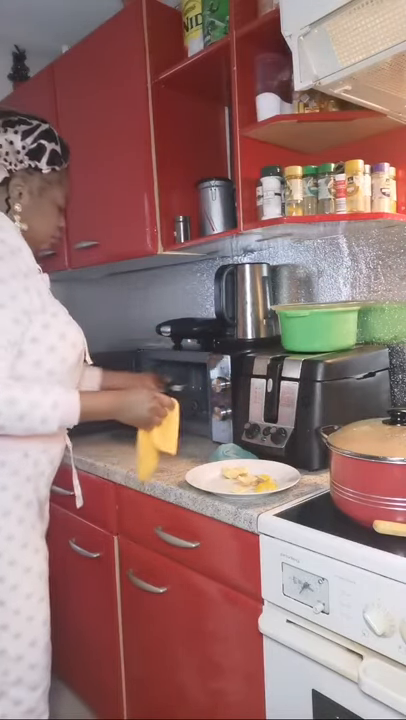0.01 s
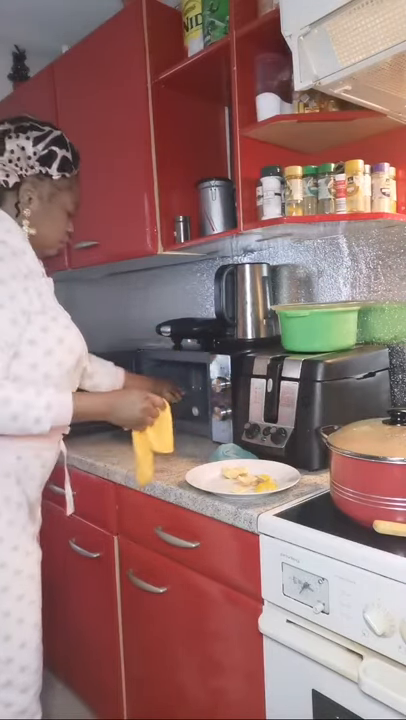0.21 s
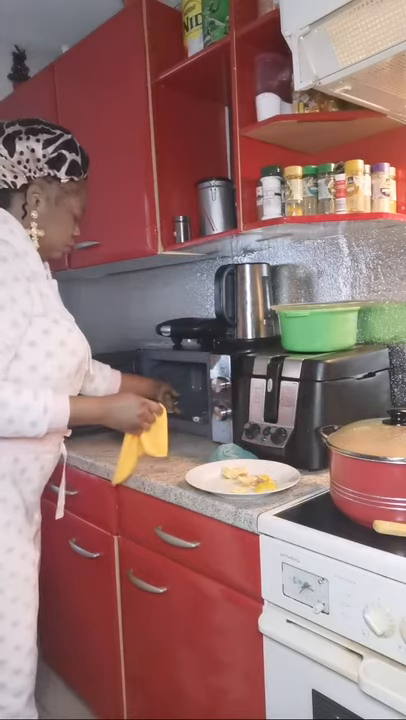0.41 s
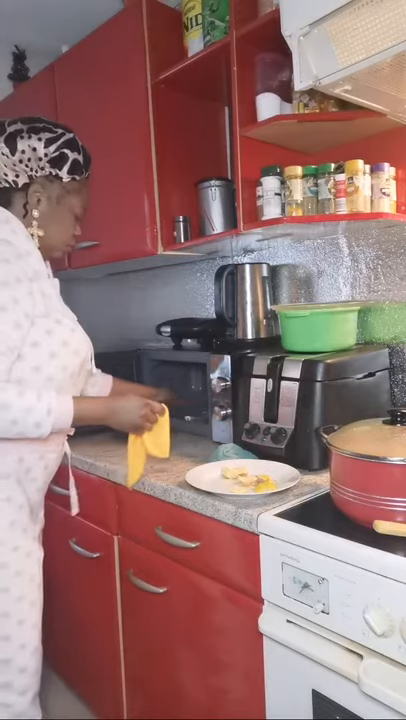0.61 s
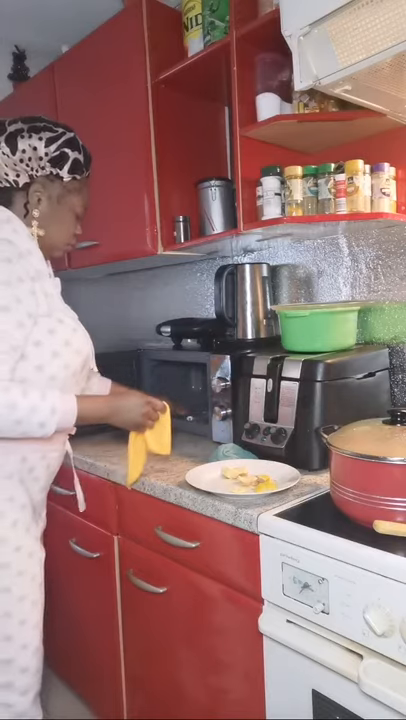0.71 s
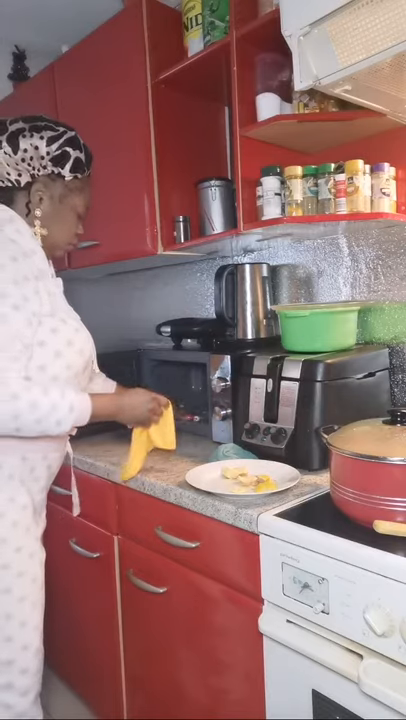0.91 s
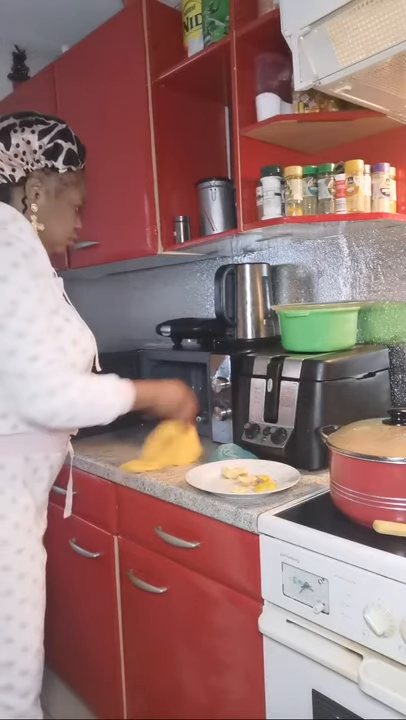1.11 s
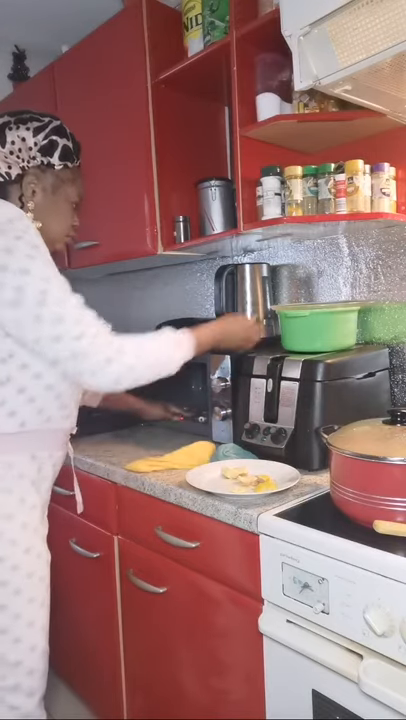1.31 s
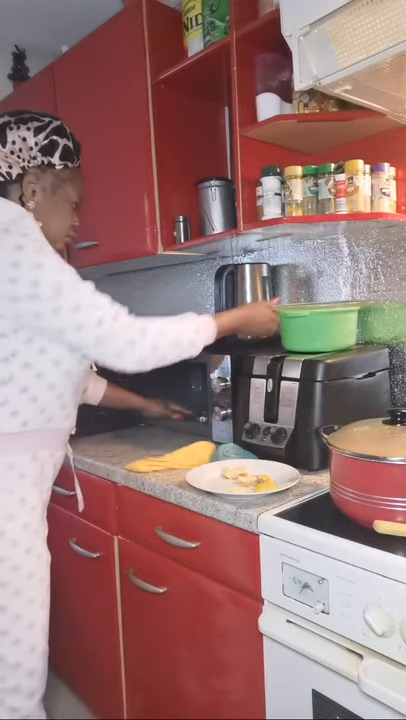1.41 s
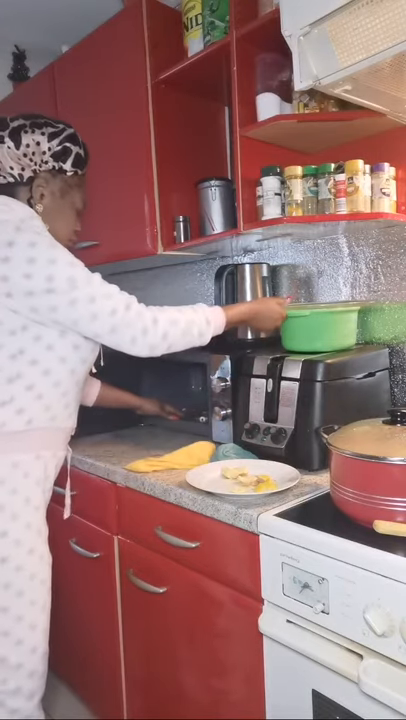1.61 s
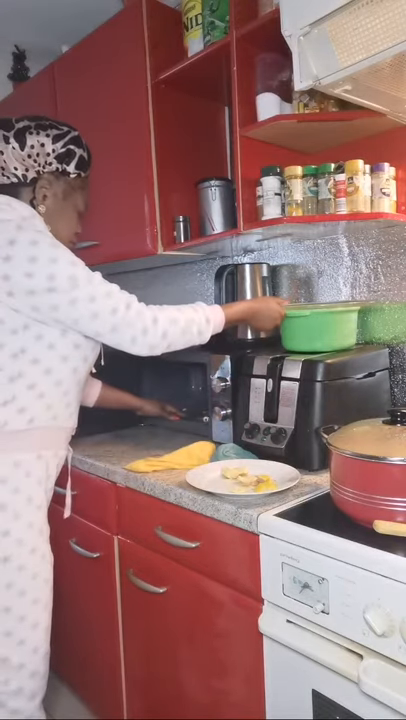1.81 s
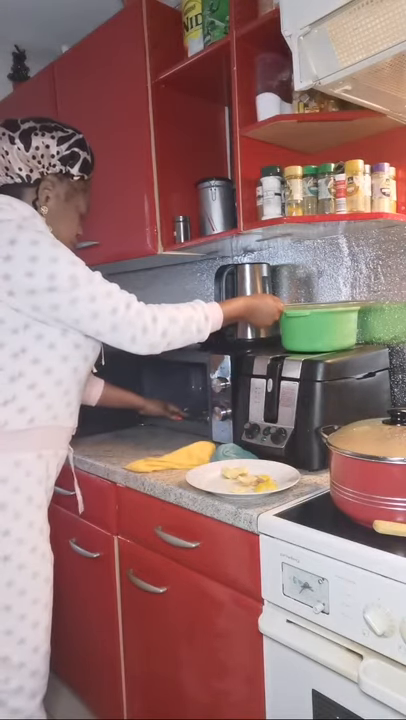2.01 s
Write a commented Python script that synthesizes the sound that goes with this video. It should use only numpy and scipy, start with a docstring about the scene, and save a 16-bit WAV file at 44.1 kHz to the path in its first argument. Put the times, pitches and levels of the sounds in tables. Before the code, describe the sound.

Sharp glassy cracks with short rings come in quick clusters as a turntable plate settles inside a microwave oven, growing softer and duller; hard-walled small kitchen, fairly near microphone, faint air hiss and mains hum.

```python
"""A small hard-walled kitchen: a glass turntable plate is set and shifted inside a microwave oven.
Each contact cracks (grainy noise, shaped in tone and decay) and rings plate, support and steel
cavity (damped sines); the room answers with a diffuse noise tail.
Underneath lie a faint hiss of room air (shaped noise), a wavering appliance hum (narrow noise)
and a steady mains tone (sine)."""
import sys
import numpy as np
from scipy import signal
from scipy.fft import rfft, irfft, next_fast_len
from scipy.io import wavfile

SR = 44100
rng = np.random.default_rng(int(sys.argv[2]) if len(sys.argv) > 2 else 0)


def wav_out(sig):
    """Save sig, one row per channel (or a flat mono array), as 16-bit PCM at SR to the path in sys.argv[1]."""
    wavfile.write(sys.argv[1], SR, np.round(np.clip(np.atleast_2d(sig).T, -1, 1) * 32767).astype(np.int16))


N = 90405


def amp(db):
    """dB to gain."""
    return 10 ** (np.asarray(db) / 20)


def unit(x):
    """Scale to rms 1."""
    return x / np.sqrt(np.mean(x ** 2) + 1e-20)


def along(points, hz):
    """Read a curve of (frequency, value) points on a log frequency axis."""
    f, v = np.transpose(points)
    return np.interp(np.log(hz + 1), np.log(f + 1), v)


def filtered(x, response):
    """Shape the spectrum of x by a gain that depends on frequency."""
    m = next_fast_len(len(x) + 8192)
    return irfft(rfft(x, m) * response(np.fft.rfftfreq(m, 1 / SR)), m)[:len(x)]


# Spectrum of the room air: f/Hz, relative level/dB
AIR_SPECTRUM = [(15, -29), (25, -19), (43, -6), (148, -11), (184, -11.5), (211, -11), (307, -3),
                (361, -15.5), (654, -16.5), (1590, -32.5), (2090, -29.5), (4330, -40.5), (15800, -37)]
AIR_DB = -59.5  # rms


def room_air():
    """Steady broadband hiss, strongest in the bass."""
    return amp(AIR_DB) * unit(filtered(rng.standard_normal(N), lambda f: amp(along(AIR_SPECTRUM, f))))


# Hum resonances: f/Hz, half-width at half gain/Hz, rms level/dB
HUM_BANDS = [(87.8, 7.7, -68.5), (184.7, 8.7, -62.5), (316, 13, -63)]


def appliance_hum():
    """Noise squeezed into narrow resonances, so each hum tone wavers in level."""
    hum = np.zeros(N)
    for hz, width, db in HUM_BANDS:
        band = filtered(rng.standard_normal(N), lambda f: 1 / (1 + ((f - hz) / width) ** 2))
        hum += amp(db) * unit(band)
    return hum


MAINS_HZ, MAINS_PEAK_DB = 50, -65.5


def mains_tone():
    """A steady sine at the mains frequency."""
    return amp(MAINS_PEAK_DB) * np.sin(2 * np.pi * MAINS_HZ * np.arange(N) / SR)


RATTLE_DB, GRAIN = 3.5, 22  # spread of grain levels; grain length in samples (half a millisecond)


def rattle(size):
    """Noise in grains of uneven level: glass chattering on a hard surface."""
    grains = np.repeat(rng.standard_normal(size // GRAIN + 1), GRAIN)[:size]
    return unit(rng.standard_normal(size) * amp(RATTLE_DB * grains))


LEAD = 660  # samples before the blow
SWELL_DB, SWELL_S = -10, 0.0033  # soft noise swelling just before the blow; level, rise time constant
TICK_T60_S = 0.015


def crack(colour, tick_db, t60, t):
    """Noise swells softly, then the blow dies at two speeds: contact noise and a sharp tick."""
    swell = amp(SWELL_DB) * np.exp(-t[LEAD:0:-1] / SWELL_S)
    decay = amp(-60 * t / t60) + amp(tick_db - 60 * t / TICK_T60_S)
    noise = rattle(LEAD + len(t)) * np.r_[swell, decay]
    # the square root darkens the noise before the landing's own colour
    return filtered(noise, lambda f: amp(along(colour, f)) / np.sqrt(f / 3000 + 0.037))


MODE_SCATTER_DB, RING_RISE_S = 2, 0.0073  # spread of mode levels; rise time constant


def ring(modes, t, free):
    """Damped sine modes, levels new for each blow; free is the share of the free ring length."""
    hz, db, t60 = np.transpose(modes)[:, :, None]
    level = db + MODE_SCATTER_DB * rng.standard_normal(hz.shape) - 60 * t / (t60 * free)
    return (amp(level) * np.sin(2 * np.pi * hz * t)).sum(0) * (1 - np.exp(-t / RING_RISE_S))


# Decay of the room: f/Hz, t60/s
ROOM_DECAY = [(250, 0.32), (1000, 0.51), (3000, 0.41), (7000, 0.28), (15000, 0.18)]
# Build-up of the room: f/Hz, time constant/s
ROOM_BUILDUP = [(250, 0.01), (1000, 0.0027), (4000, 0.001)]


def room_tail():
    """A fresh diffuse answer; each frequency builds up and dies at its own speed."""
    hz, t, noise = signal.stft(rng.standard_normal(SR // 2), SR, nperseg=128)
    decay = amp(-60 * t / along(ROOM_DECAY, hz)[:, None])
    buildup = 1 - np.exp(-t / along(ROOM_BUILDUP, hz)[:, None])
    shape = decay * buildup
    shape = shape / np.linalg.norm(shape, axis=1, keepdims=True)
    tail = signal.istft(noise * shape, SR, nperseg=128)[1][:SR // 2]
    return tail / np.linalg.norm(tail)


# Centres of the ten colour bands: f/Hz
COLOUR_HZ = [220, 450, 880, 1400, 2050, 3000, 4500, 6700, 10000, 14500]
# Each landing of the glass: t/s, level/dB, ten colour levels/dB (at COLOUR_HZ),
# plate ring/dB, cavity ring/dB, support ring/dB, ring length/share of free ring,
# sharp tick/dB, contact t60/s
LANDINGS = [ (.201, -7.5, -25, -21, -12, -18, -13.5, -19, -17, -17.5, -17, -15, -5.5, -16, -36, 0.94, 6.4, 0.043),
            (.219, -18.5, -28, -10, -24, -17, -9, -26, -24, -16.5, -33, -21, -2.5, -21, -25, 0.71, 4.4, 0.027),
            (0.4174, -14.5, -31, -26, -27, -26, -23, -24.5, -22.5, -20.5, -14.5, -12.5, -15, -11.5, -15, 0.42, 11.4, .025),
            (.433, -29.5, -12, -19.5, -14, -22, -21, -32, -12, -18, -10, -19, -19, -10, -4, 1, 6, .013),
            (0.471, -25, -27, -24, -20.5, -36, -38, -32, -9, -10.5, -8, -11, -21, -4, -20, 0.52, 4, .037),
            (.483, -6, -56, -31, -34.5, -46, -25, -19, -20, -15.5, -15, -19, -18.5, -10.5, -13, 0.82, 5.8, .024),
            (.513, -20, -39, -11, -9, -14, -14.5, -11, -10, -28, -38, -24.5, -13, -9, -18.5, 1, 10, 0.093),
            (.695, -30, -42, -11.5, -20, -10.5, -14.5, -19, -13.5, -22, -10, -20, -14, -21.5, -29, .7, 7.1, 0.05),
            (.721, -28, -21, -9.5, -9, -14, -14, -16, -15, -31, -32, -33.5, -8.5, -16, -11, 0.52, 6.5, 0.078),
            (.787, -20.5, -25, -11, -14, -16, -17.5, -18.5, -19, -26, -25.5, -36, -5.5, -3, -8.5, 0.39, 4.3, 0.046),
            (.815, -38.5, -28.5, -6.5, -3.5, -10, -17, -26, -35, -38, -37, -35, -8.5, -29, -5.5, 0.91, 7, .04),
            (1.011, -15, -27, -16.5, -11.5, -13, -7.5, -17, -12, -18, -18, -22.5, -14, -17.5, -7.5, 0.75, 8.97, 0.033),
            (1.037, -27.5, -28, -2, -15, -26, -9, -12, -32, -30, -28, -37.5, -19, -16, -20, 0.54, 5.7, .02),
            (1.674, -37.5, -13, 0, -17, -9.5, -22, -42, -34, -39.5, -37, -36, -9, -14, -26, .6, 5, 0.075),
            (1.749, -23, -32, -8.5, -11, -11.5, -14, -12, -12.5, -22, -24.5, -38.5, -12.5, -7, -20, 0.72, 11.6, 0.0083),
            (1.774, -32.5, -26, -19, -5.5, -15, -9, -21, -34, -28, -42, -58, -0.5, -9, -10, 0.55, 5.2, .012)]
# Glass plate modes: f/Hz, level/dB, free t60/s
PLATE_MODES = [(280, -6, .3), (597, -6, .36), (868, -7, .33), (892, -6, .33), (938, -5, .26),
               (1169, -11, .5), (1533, -9, .3), (1846, 1, .3), (2078, -2, .4), (2593, -3, .7),
               (2875, -6, .32), (3548, -14, .3), (7300, -13, .3)]
# Steel cavity modes: f/Hz, level/dB, free t60/s
CAVITY_MODES = [(1047, 8, .2), (1265, 2, .14), (1470, 1, .16), (1760, 0, .16), (2407, 3, .13),
                (4129, 3, .16), (4400, 2, .16), (9300, -2, .1), (10650, -1, .1)]
# Modes of the support under the plate: f/Hz, level/dB, free t60/s
SUPPORT_MODES = [(384.9, 7.5, 0.38), (493.6, -4, 0.24), (2170, -7.5, 0.26), (2200, -7.5, .45),
                 (3220, -7, 0.59)]
# Direct path of the crack, bass arrives mostly by the walls: f/Hz, level/dB
DIRECT_PATH = [(200, -12.5), (800, -5), (2500, 0.5)]
CRACK_ROOM_DB, RING_ROOM_DB = 6.5, -13  # sends to the room


def contacts():
    """Every landing excites crack and rings, coloured by how it lands, and the room answers."""
    out, t = np.zeros(N + SR), np.arange(SR // 2) / SR
    for s, db, *colour_db, plate_db, cavity_db, support_db, free, tick_db, t60 in LANDINGS:
        # the colour falls away below its lowest band
        colour = [(90, colour_db[0] - 23.5)] + list(zip(COLOUR_HZ, colour_db))
        blow = crack(colour, tick_db, t60, t)
        rings = amp(plate_db) * ring(PLATE_MODES, t, free)
        rings += amp(cavity_db) * ring(CAVITY_MODES, t, free)
        rings += amp(support_db) * ring(SUPPORT_MODES, t, free)
        rings = filtered(np.pad(rings, (LEAD, 0)), lambda f: amp(along(colour, f)))
        send = amp(CRACK_ROOM_DB) * blow + amp(RING_ROOM_DB) * rings
        wet = signal.fftconvolve(send, room_tail())[:len(blow)]
        direct = filtered(blow, lambda f: amp(along(DIRECT_PATH, f)))
        start = round(s * SR) - LEAD
        out[start:start + len(blow)] += amp(db) * (direct + rings + wet)
    return out[:N]


def scene():
    """The handling over the quiet kitchen."""
    background = room_air() + appliance_hum() + mains_tone()
    return (background + contacts())[None]


# Microphone peaks: f/Hz, half-width at half the dB boost/Hz, level/dB
MIC_PEAKS = [(5327, 300, 2.5), (8990, 240, 7), (11000, 300, 4.5)]
LOW_HZ, TOP_HZ = 41.16, 15900  # bass cut at half gain; upper band limit


def record(dry):
    """Microphone resonances lift narrow bands; the deep bass and the top are cut."""
    def microphone(f):
        peaks_db = sum(db / (1 + ((f - hz) / width) ** 2) for hz, width, db in MIC_PEAKS)
        bass_cut = f ** 4 / (f ** 4 + LOW_HZ ** 4)
        return amp(peaks_db) * bass_cut * (f < TOP_HZ)
    return filtered(dry[0], microphone)[None]


dry = scene()
out = record(dry)
wav_out(out)
```